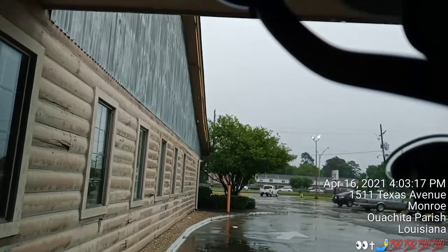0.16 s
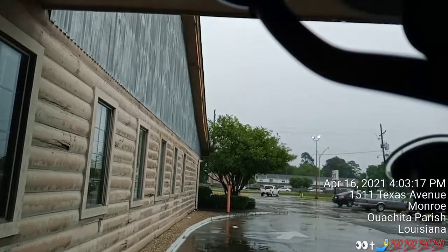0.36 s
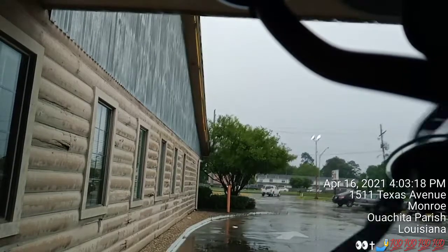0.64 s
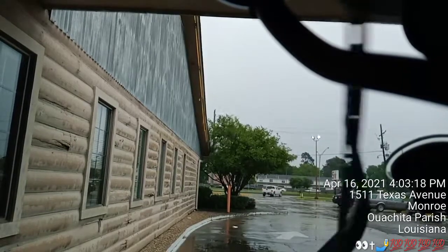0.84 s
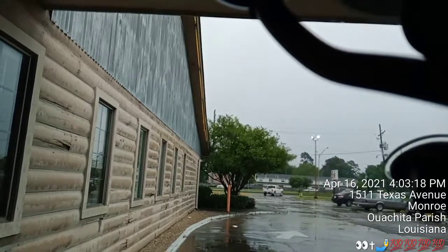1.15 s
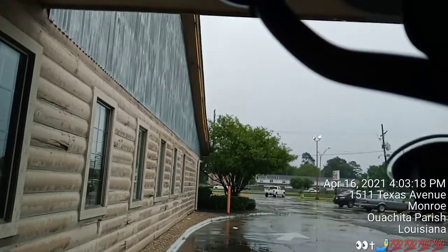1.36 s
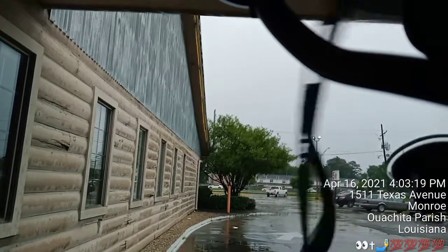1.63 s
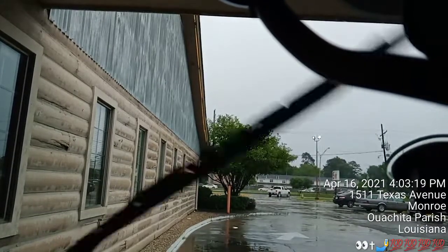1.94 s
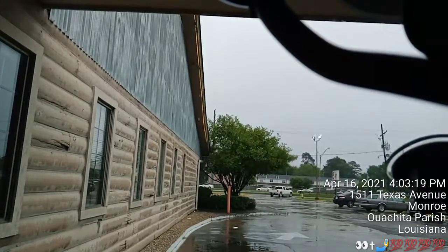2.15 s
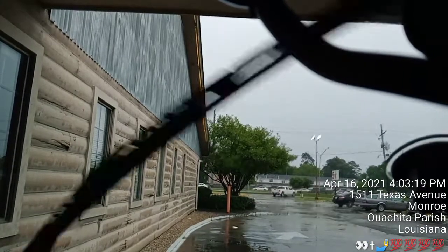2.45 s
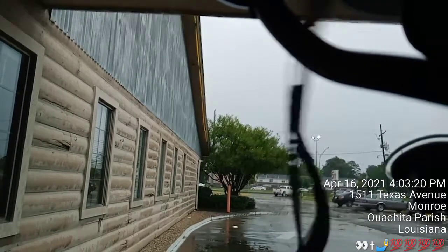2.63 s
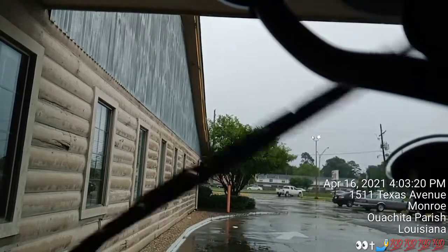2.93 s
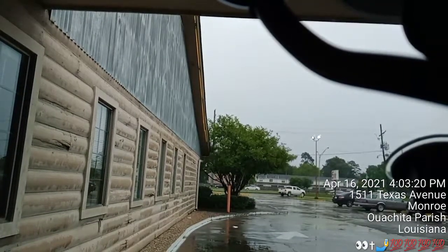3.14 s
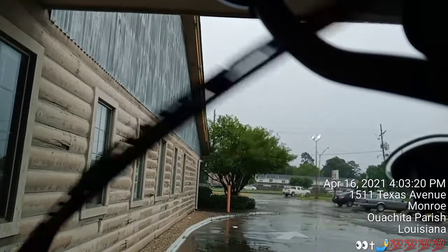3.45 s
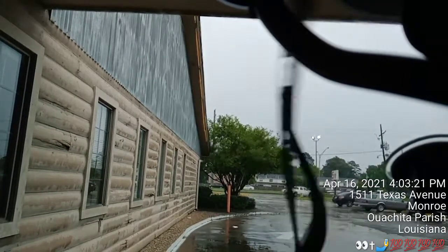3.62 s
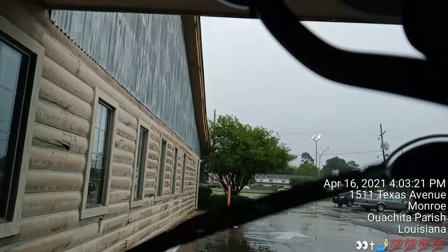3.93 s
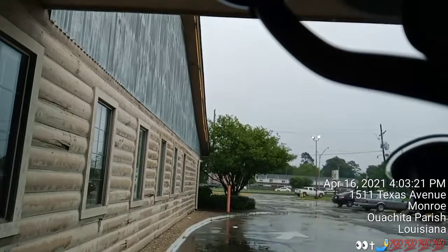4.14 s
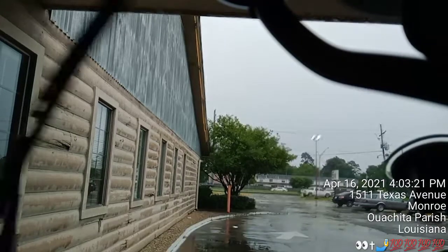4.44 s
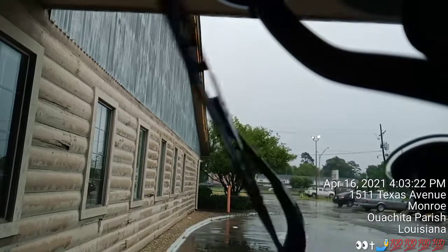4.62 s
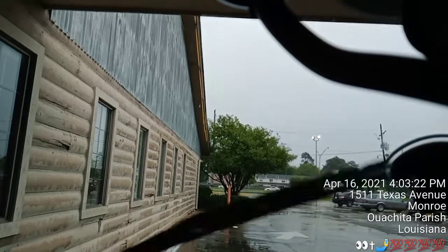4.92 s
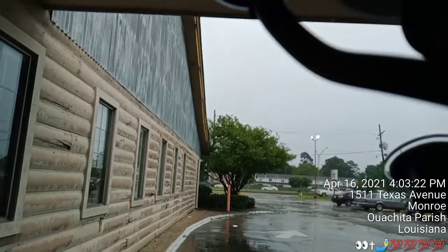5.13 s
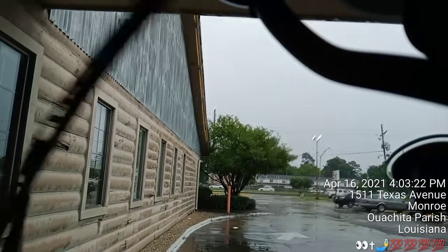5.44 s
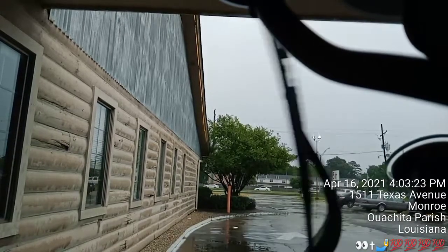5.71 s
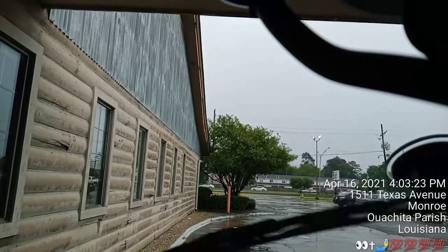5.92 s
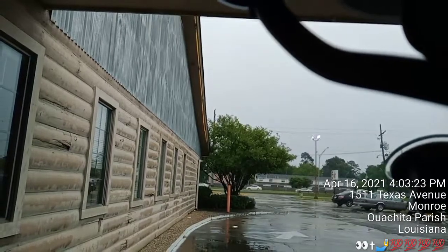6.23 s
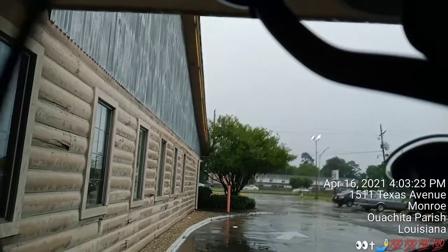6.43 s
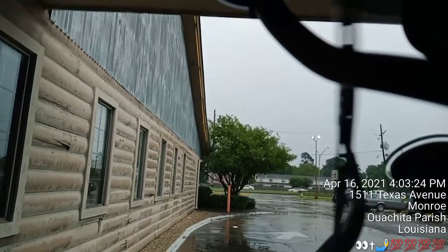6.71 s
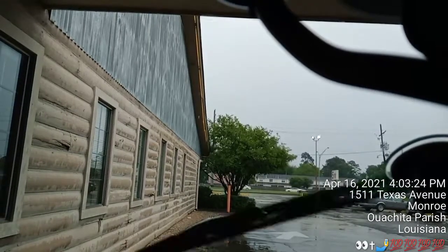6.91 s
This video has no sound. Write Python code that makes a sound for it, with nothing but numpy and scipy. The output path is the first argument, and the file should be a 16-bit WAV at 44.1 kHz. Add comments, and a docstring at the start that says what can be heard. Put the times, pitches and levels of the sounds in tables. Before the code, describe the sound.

Windshield wipers work steadily on wet glass, heard from inside a parked car for about seven seconds. The blades first scuff to a stop and knock at around 0.2 seconds. Upward sweeps begin at roughly 0.4, 1.4, 2.3, 3.3, 4.3, 5.3 and 6.3 seconds, each a high, raspy, wavering rubber squeal lasting a third of a second. Right after each squeal the blades flip over with a dull, resonant thud, which comes as a quick cluster near 3.7 seconds. On the way down the rubber gives a brief, quieter low groan, sometimes with a small rasp or squeak, then halts with a thumping scuff and a short knock. A last soft scuff comes at 7 seconds. The wiper motor hums quietly, swelling at each reversal, with a faint whine on the downstrokes. A steady low cabin rumble and very faint rain patter and hiss continue throughout.

```python
"""Wipers on a wet windshield

Inside a parked car, the blades sweep about once a second. The rubber sticks and slips in a squeal
on the way up, flips over with a thud that rings pane and cowl, groans on the way down, then scuffs
to a halt before the linkage knocks. The wiper motor hums harder at each reversal, over a low cabin
rumble and the faint patter and hiss of light rain."""
import sys
import numpy as np
from scipy import signal
from scipy.fft import rfft, irfft
from scipy.io import wavfile
from scipy.ndimage import uniform_filter1d, map_coordinates

SR = 44100
rng = np.random.default_rng(int(sys.argv[2]) if len(sys.argv) > 2 else 0)


def generate_wav(sig):
    """Save sig (samples, or channels by samples) to the path in sys.argv[1] as 16-bit PCM at SR."""
    pcm = np.round(np.clip(np.atleast_2d(sig).T, -1, 1) * 32767).astype(np.int16)
    wavfile.write(sys.argv[1], SR, pcm)


N = 311787
TIME = np.arange(N) / SR

# upward sweeps: start/s, length/s, level/dB, time to grip/s, roughness/0-1
UPSTROKES = [(0.392, 0.35, -1.5, 0.014, 0.79), (1.359, 0.35, -1.8, 0.0074, 0.81),
             (2.332, 0.35, -1, 0.007, 0.88), (3.309, 0.36, -1.27, 0.0044, 0.87),
             (4.287, 0.342, -1.14, 0.0062, 0.9), (5.267, 0.36, -1.86, 0.015, 0.89),
             (6.268, 0.335, -1.47, 0.03, 0.77)]
# blades flip at the top: t/s, body/dB, boom/dB, length/s
FLIPS = [(0.78, -16, -12.5, 0.026), (1.749, -14.5, -16.5, 0.034), (2.726, -14, -14, 0.032),
         (3.707, -10.5, -19, 0.05), (3.742, -16, -18, 0.051), (4.674, -14, -17.5, 0.057),
         (5.665, -11.5, -16, 0.028), (6.652, -14, -12, 0.039)]
# short sharp knocks, one at the bottom of each sweep and one just after the fourth flip at the top:
# t/s, body/dB, boom/dB, length/s
KNOCKS = [(0.28, -21.5, -18, 0.015), (1.248, -19.5, -21, 0.016), (2.221, -18.5, -23, 0.011),
          (3.195, -20, -23.5, 0.014), (3.783, -16, -18.5, 0.015), (4.169, -19, -20.5, 0.014),
          (5.148, -18, -26, 0.023), (6.138, -15.5, -28, 0.016)]
# harmonics of the taut rubber lip: multiple, level/dB
LIP_PARTIALS = [(1, 6.5), (2, -0.5), (3, -18.5)]
# harmonics of the trailing rubber: multiple, level/dB
GROAN_PARTIALS = [(1, 3.5), (2, -22), (3, -26.5), (4, -26.5)]
# bright friction of rubber on glass: f/Hz, level/dB
RASP_SPECTRUM = [(500, -28.5), (1000, -25), (1450, -12), (1800, 1), (2300, 8), (2750, 1), (3150, -13),
                 (3700, 3.5), (4400, -3.5), (5300, -3.5), (6500, -2), (7200, -19), (8000, -56)]
# dull drag of rubber over the pane: f/Hz, level/dB
DRAG_SPECTRUM = [(60, -20.5), (130, -5.5), (230, -9), (310, 2.5), (400, 0.5), (520, -8), (630, -10.5),
                 (800, -20.5), (1100, -22), (1600, -28.5), (3000, -61)]


def squeal():
    """On the upstroke the lip sticks and slips: a taut and a slack stretch sing over rasp and drag."""
    # harmonics of the slack stretch: multiple, level/dB
    slack_partials = [(1, 10), (2, 12), (3, -18), (4, -31.5)]
    out, t = np.zeros(N), np.arange(2 * SR // 5) / SR
    for start, length, stroke_db, grip_s, roughness in UPSTROKES:
        progress = t / length + 0.01183 * drift(12, len(t))   # no two sweeps run quite alike
        taut_hz, slack_hz, taut_db, slack_db, rasp_db, rough_share = blade_travel(progress)
        rough = roughness * rough_share
        # the middle of the lip holds its pitch; the stretches toward the tips scatter
        middle = stick_slip(taut_hz, LIP_PARTIALS, spread=0.055 * rough, wander_rate=55,
                            jitter=0.0256 * rough, jitter_rate=600, flutter_db=1.5, count=1)
        tips = stick_slip(taut_hz, LIP_PARTIALS, spread=0.15 * rough, wander_rate=40,
                          jitter=0.02 * rough, jitter_rate=810, flutter_db=6.5, count=5)
        taut = rms_one(middle + from_db(2) * tips)
        slack = stick_slip(slack_hz, slack_partials, spread=0.045 * rough, wander_rate=45,
                           jitter=0.0338 * rough, jitter_rate=700, flutter_db=2.5, count=2)
        rasp = rms_one(colour(grains(9000, 0.79, len(t)), RASP_SPECTRUM))
        drag = from_db(-45) * rms_one(colour(rng.standard_normal(len(t)), DRAG_SPECTRUM))
        chatter = from_db(0.82 * drift(160.4, len(t)))
        grip = gate(t, length, attack_s=grip_s, release_s=0.0047)
        friction = from_db(taut_db) * taut + from_db(slack_db) * slack + from_db(rasp_db) * rasp
        add(out, start, from_db(stroke_db) * grip * (chatter * friction + drag))
    return out


def blade_travel(progress):
    """Pitch, level and roughness follow the blade's speed and pressure as progress runs from 0 to 1."""
    # pitch of the taut lip: progress/0-1, f/Hz
    lip_pitch = [(0, 1820), (.15, 2184), (.26, 2077), (.39, 2270), (.52, 2037), (.68, 2223), (.83, 2200),
                 (.93, 2020), (1, 1860)]
    # the slack stretch sags at full speed, as the arm brakes and just before the top:
    # centre/share of stroke, half width/share of stroke, drop/Hz, gain/dB
    sags = [(.47, .26, 620, 7), (0.764, .075, 247.6, 9.5), (.95, 0.068, 30.2, 1)]
    slowness = 1 - np.sin(np.pi * np.clip(progress, 0, 1))
    press = np.cos(2 * np.pi * 6.5 * (progress - 0.485))   # the rocking arm presses in surges
    sag_hz = sum(drop * arch(progress, at, width) ** 1.5 for at, width, drop, _ in sags)
    sag_db = sum(db * np.sqrt(arch(progress, at, width)) for at, width, _, db in sags)
    dip_db = 3 * arch(progress, 0.87, 0.033)   # the squeal dips briefly near the top
    taut_hz = np.interp(progress, *np.transpose(lip_pitch))
    slack_hz = 1903 * (1 - 0.13 * slowness ** 2) - sag_hz
    taut_db = -21.5 - 5 * slowness + 2 * (progress - 0.5) + 0.5 * press - dip_db
    slack_db = -37 + sag_db - 0.5 * press - dip_db
    late_fade = np.maximum(progress - 0.68, 0) / (1 - 0.68)
    rasp_db = -25.5 + 0.5 * slowness - 14.5 * late_fade
    rough_share = (1 - 0.301 * slowness) * (1 - 0.1992 * press)   # cleaner when slow or pressed hard
    return taut_hz, slack_hz, taut_db, slack_db, rasp_db, rough_share


def stick_slip(hz, partials, spread, wander_rate, jitter, jitter_rate, flutter_db, count):
    """Stretches of rubber stick and slip, each wandering about one pitch; overtones come and go."""
    size, out = len(hz), 0
    for k in range(count):
        wander = spread * (k + 1) / count * drift(wander_rate, size)
        own_hz = hz * (1 + wander + jitter * drift(jitter_rate, size))
        cycles = np.cumsum(own_hz) / SR
        pressure = from_db(flutter_db * drift(111.9, size))
        for multiple, db in partials:
            gain = from_db(db + 3 * np.log(multiple) * drift(80, size))
            out = out + pressure * gain * np.sin(2 * np.pi * (multiple * cycles + rng.random()))
    return rms_one(out)


def catches():
    """Short rasps where the returning lip meets a drier patch; the hardest break into a squeak."""
    # the lip catches between upstrokes: t/s, length/s, level/dB
    dry_patches = [(0.94, 0.032, -45.5), (1.296, 0.13, -47), (2.036, 0.05, -49), (2.1, 0.042, -38),
                   (2.869, 0.053, -42.5), (2.944, 0.077, -40), (4.979, 0.072, -45), (5.021, 0.046, -35),
                   (5.051, 0.064, -37)]
    contact = sum(from_db(db) * swell(s, length) for s, length, db in dry_patches)
    rasp = rms_one(colour(grains(6300, 2.3), RASP_SPECTRUM)) * from_db(2 * drift(120))
    squeak = tone(2080 * (1 + 0.072 * drift(390)), LIP_PARTIALS[:2])
    return contact * (rasp + from_db(-2.5) * (contact / contact.max()) ** 2 * squeak)


def flips():
    """The blades flop over with a thud at the top of the sweep."""
    return blows(FLIPS, body_db=-2, boom_db=-3.5, clack_db=-24.5, tick_db=-35, rise_s=0.0057,
                 boom_lag_s=0.007, contacts_per_s=800, quiver=0.37, lean=0.32)


def scuffs():
    """The blades scuff to a halt at the bottom of the pane."""
    # blade stops: t/s, body/dB, boom/dB, length/s
    stops = [(0.158, -31.5, -38, 0.02), (0.181, -23, -18.5, 0.056), (1.154, -21, -20, 0.062),
             (2.122, -20, -31, 0.061), (3.103, -21, -34, 0.054), (4.077, -21, -21.5, 0.051),
             (5.058, -19.5, -23.5, 0.058), (6.041, -23.5, -43, 0.068), (7.033, -27, -48, 0.068)]
    return blows(stops, body_db=-2, boom_db=0, clack_db=-33.5, tick_db=-35.5, rise_s=0.0068,
                 boom_lag_s=0.021, contacts_per_s=870, quiver=0.12, lean=0.17)


def knocks():
    """Short sharp knocks of the linkage ring the cowl."""
    return blows(KNOCKS, body_db=-1, boom_db=-2, clack_db=-30.5, tick_db=-32.5, rise_s=0.004,
                 boom_lag_s=0.008, contacts_per_s=1100, quiver=0.18, lean=0.26)


def blows(hits, body_db, boom_db, clack_db, tick_db, rise_s, boom_lag_s, contacts_per_s, quiver, lean):
    """Each blow is a judder of contacts into the cowl; the heavy low modes answer a little later."""
    # resonances of pane and cowl: f/Hz, level/dB, t60/s
    cowl_modes = [(66.5, -18.5, 0.22), (111.7, 0.5, 0.3), (146, 3.5, 0.26), (190.6, 2, .16),
                  (253, -4.5, 0.14), (310.9, 2.5, 0.095), (326.6, 1.5, 0.09), (421.6, -3.5, 0.096),
                  (500, 4, 0.031), (607.7, 2, 0.081), (670, -1, 0.0097), (880, -12, 0.03),
                  (948, -10.5, 0.12)]
    # bright tick of the contacts: f/Hz, level/dB
    tick_spectrum = [(700, -13.5), (1200, 6), (2300, 4), (3200, 0), (4500, -9.5), (6500, -7), (7600, -42.5)]
    out, t = np.zeros(N), np.arange(-SR // 20, SR // 4) / SR
    usual_db = np.median([hit[1] for hit in hits])
    for s, body, boom, length in hits:
        accent_db = body - usual_db   # clack and tick follow it only in part
        release = np.exp(-(np.maximum(t, 0) / length) ** 3)
        push = release * (1 + np.tanh(t / rise_s)) / 2
        # the rubber starts to lean over before the blow, and the arm quivers on after it
        tremble = np.where(t < 0, lean * np.exp(t / 0.024), quiver * np.exp(-t / 0.051))
        shudder = push + tremble
        bands = [(0, 220, boom + boom_db, boom_lag_s),
                 (220, 480, body + body_db, 0),
                 (480, SR, 0.42 * accent_db + clack_db, 0)]
        for low_hz, high_hz, band_db, lag_s in bands:
            ringing = 0
            for hz, db, t60 in cowl_modes:
                if low_hz <= hz < high_hz:
                    contacts = shudder * grains(contacts_per_s, 1.9, len(t))
                    ringing = ringing + from_db(db) * rms_one(ring(contacts, hz, t60))
            add(out, s + t[0] + lag_s, from_db(band_db) * loudest_one(ringing))
        bite = push * release   # dies sooner than the push
        ticks = colour((bite + 0.14 * tremble) * grains(2500, 3.2, len(t)), tick_spectrum)
        add(out, s + t[0], from_db(0.48 * accent_db + tick_db) * loudest_one(ticks))
    # a small panel radiates little deep bass
    return signal.sosfilt(signal.butter(2, 62, "high", fs=SR, output="sos"), out)


def groan():
    """On the downstroke the trailing rubber shudders at a low pitch over its own dragging noise."""
    # downstroke groans: start/s, length/s, f/Hz, level/dB
    groans = [(-0.12, 0.14, 360.5, -41), (0.84, 0.15, 334.3, -31), (1.829, 0.089, 345, -30.5),
              (2.806, 0.13, 345.4, -31.5), (3.813, 0.043, 353.5, -32), (4.746, .12, 348, -33),
              (5.712, 0.18, 347, -34.5), (6.709, 0.18, 350, -34.5)]
    rise_hz_per_s = 50
    out, t = np.zeros(N), np.arange(2 * SR // 5) / SR
    for start, length, hz, db in groans:
        pitch = (hz + rise_hz_per_s * (t - length / 2)) * (1 + 0.02 * drift(130, len(t)))
        shudder = from_db(-2.5 + 1.2 * drift(75, len(t))) * tone(pitch, GROAN_PARTIALS)
        drag = from_db(-5.5) * rms_one(colour(grains(2500, 1.6, len(t)), DRAG_SPECTRUM))
        contact = gate(t, length, attack_s=0.018, release_s=0.022)
        level = from_db(db + 3 * drift(27.5, len(t)))
        add(out, start, (level * contact * (shudder + drag))[start + t >= 0])
    return out


def singing_arm():
    """One arm sings briefly as it sets off."""
    pitch_hz = 615 * (1 + 0.0033 * drift(27))
    return from_db(-45) * swell(3.3, length=0.14) * tone(pitch_hz, GROAN_PARTIALS)


def motor():
    """The wiper motor hums and shakes in step with its load."""
    # harmonics of the motor's rotation: multiple, level/dB
    hum_partials = [(1, -9.5), (2, 2), (3, -1.5)]
    turns_per_s = 61.57 * (1 + 0.01164 * drift(9))
    hum = tone(turns_per_s, hum_partials) * from_db(-7 + 2 * drift(18))
    low_band = signal.butter(2, [85, 190], "band", fs=SR, output="sos")
    shaking = from_db(-5) * rms_one(signal.sosfilt(low_band, rng.standard_normal(N)))
    return motor_load() * (hum + shaking)


def motor_load():
    """The motor labours just after each flip and at each knock, and runs lightest in mid upstroke."""
    at_flips = sum(strain(s + 0.042, rise_s=0.078, fall_s=0.039) for s, *_ in FLIPS)
    at_knocks = sum(strain(s, rise_s=0.03, fall_s=0.11) for s, *_ in KNOCKS)
    relief_db = 11 * sum(swell(start + length / 2, 0.17) for start, length, *_ in UPSTROKES)
    return from_db(-relief_db) * (from_db(-41) + from_db(-29.5) * at_flips + from_db(-39) * at_knocks)


def gear_whine():
    """The gears whine on one thin tone through each downstroke."""
    downstroke = sum(swell(start + 0.59, length=0.46) for start, *_ in UPSTROKES)
    pitch_hz = 363 * (1 + 0.0066 * drift(6.4))
    return from_db(-47.5) * downstroke * tone(pitch_hz, GROAN_PARTIALS[:1])


def cabin_rumble():
    """A steady bed of low noise fills the cabin."""
    # cabin rumble: f/Hz, level/dB
    rumble_spectrum = [(20, -25.5), (32, -6), (52, 5), (80, -1.5), (115, 8.5), (160, -1), (230, -7.5),
                       (310, -1.5), (420, -15.5), (600, -20), (800, -27), (1200, -29.5), (2500, -60.5)]
    return from_db(-42.5) * rms_one(colour(rng.standard_normal(N), rumble_spectrum))


def rain():
    """Fine drops patter on glass and roof over a wet hiss, which dips as the blades stop to turn."""
    # drops and wet hiss: f/Hz, level/dB
    rain_spectrum = [(500, -6), (1000, -2), (2000, 5.5), (3000, 0), (4500, -1), (6500, 0), (7200, -14.5),
                     (7800, -41)]
    drops = from_db(-61.5) * rms_one(colour(grains(400, 3.7), rain_spectrum))
    turning = sum(swell(s + 0.082, 0.091) for s, *_ in list(FLIPS) + list(KNOCKS))
    hiss_db = -54 - 1.2 * np.minimum(turning, 1) + drift(19)
    return drops + from_db(hiss_db) * rms_one(colour(rng.standard_normal(N), rain_spectrum))


def drift(rate, size=N):
    """Smooth random wander, spread about 1, that takes a new course `rate` times a second."""
    steps = np.arange(size) / SR * rate + rng.random()
    return map_coordinates(rng.standard_normal(size // 20 + 8), [steps], order=3, mode="wrap")


def grains(per_s, spread_db, size=N):
    """Random clicks of uneven strength."""
    strength = from_db(spread_db * np.minimum(rng.exponential(1, size), 4))
    return strength * rng.choice([-1, 1], size) * (rng.random(size) < per_s / SR)


def tone(hz, partials):
    """Harmonics on a moving pitch; a 0 dB partial has rms 1."""
    phase = 2 * np.pi * (np.cumsum(hz) / SR + rng.random())
    return np.sqrt(2) * sum(from_db(db) * np.sin(multiple * phase + 2 * np.pi * rng.random())
                            for multiple, db in partials)


def ring(clicks, hz, t60):
    """Clicks set a decaying sine ringing."""
    radius, angle = from_db(-60 / (t60 * SR)), 2 * np.pi * hz / SR
    feedback = [1, -2 * radius * np.cos(angle), radius * radius]
    return signal.lfilter([0, np.sin(angle)], feedback, clicks + 1e-18)


def colour(x, spectrum):
    """Minimum-phase EQ along a curve of f/Hz, level/dB."""
    hz, db = np.transpose(spectrum)
    grid = np.maximum(np.fft.rfftfreq(8192, 1 / SR), 1)
    gain = from_db(np.interp(np.log(grid), np.log(hz), db))
    cepstrum = irfft(np.log(gain))
    half = len(cepstrum) // 2
    folded = np.r_[cepstrum[0], 2 * cepstrum[1:half], np.zeros(half)]
    return signal.fftconvolve(x, irfft(np.exp(rfft(folded))))[:len(x)]


def gate(t, length, attack_s, release_s):
    """An envelope that rises, holds until `length` and dies away."""
    return (1 - np.exp(-t / attack_s)) * np.exp(-np.maximum(t - length, 0) / release_s)


def strain(s, rise_s, fall_s):
    """A load builds toward time s and then lets go."""
    return np.exp(-np.maximum((s - TIME) / rise_s, (TIME - s) / fall_s))


def swell(s, length):
    """A smooth rise and fall centred on time s."""
    return arch(TIME, s, length / 2)


def arch(x, centre, half_width):
    """A rounded hump of height 1."""
    return np.cos(np.pi / 2 * np.clip((x - centre) / half_width, -1, 1))


def from_db(db):
    """Decibels to amplitude."""
    return 10 ** (np.asarray(db) / 20)


def rms_one(x):
    """Scale to rms 1."""
    return x / np.sqrt(np.mean(x ** 2) + 1e-20)


def loudest_one(x):
    """Scale so that the loudest hundredth of a second has rms 1."""
    return x / np.sqrt(uniform_filter1d(x ** 2, size=441).max() + 1e-20)


def add(out, s, sound):
    """Mix a sound in from time s, or from 0 if s is negative."""
    at = max(round(s * SR), 0)
    out[at:at + len(sound)] += sound[:max(N - at, 0)]


def scene():
    """Wipers, drive and weather mix in mono at one place in the cabin."""
    thuds = flips() + scuffs() + knocks()
    rubber = squeal() + catches() + groan()
    mechanism = singing_arm() + motor() + gear_whine()
    return (thuds + rubber + mechanism + cabin_rumble() + rain())[None]


def record(dry):
    """A steep low-pass cuts the top treble."""
    cutoff_hz = 7650
    return signal.sosfilt(signal.ellip(10, 0.2, 80, cutoff_hz, fs=SR, output="sos"), dry)


dry = scene()
out = record(dry)
generate_wav(out)
```